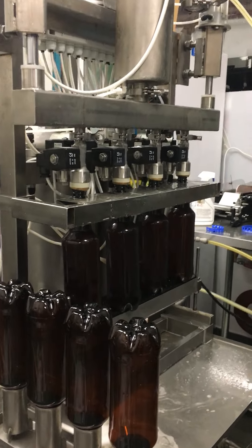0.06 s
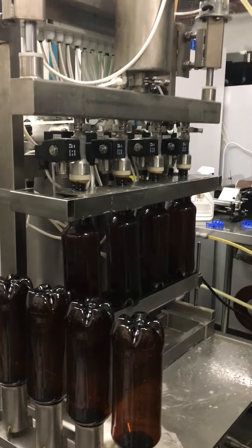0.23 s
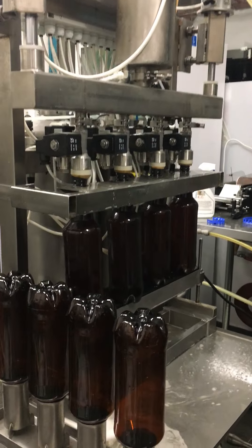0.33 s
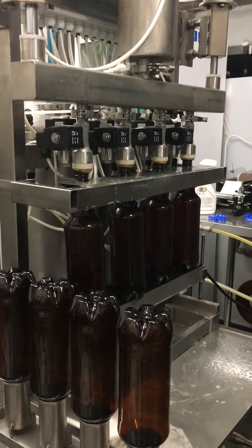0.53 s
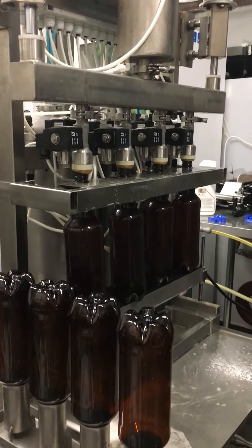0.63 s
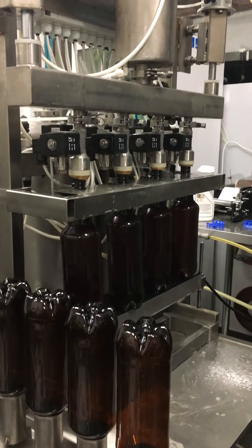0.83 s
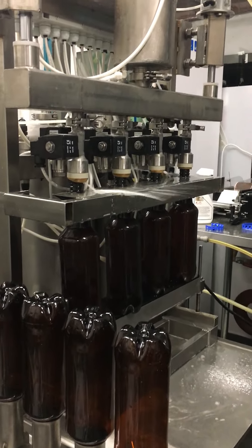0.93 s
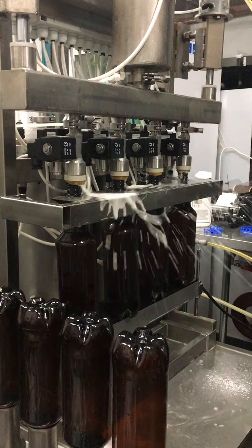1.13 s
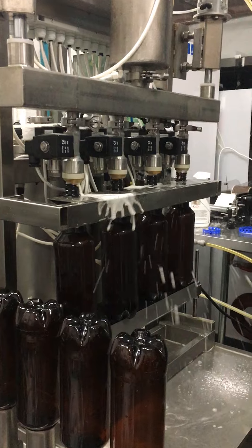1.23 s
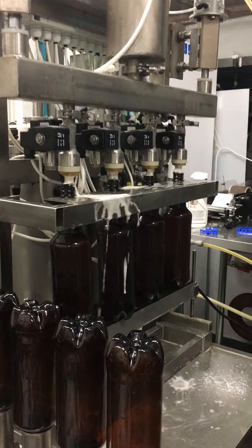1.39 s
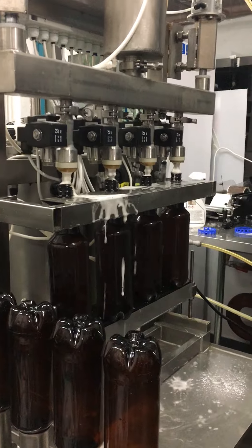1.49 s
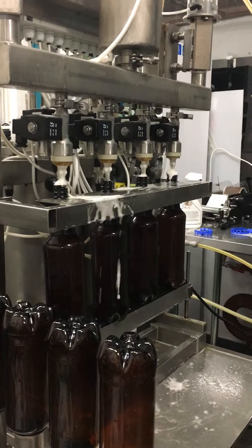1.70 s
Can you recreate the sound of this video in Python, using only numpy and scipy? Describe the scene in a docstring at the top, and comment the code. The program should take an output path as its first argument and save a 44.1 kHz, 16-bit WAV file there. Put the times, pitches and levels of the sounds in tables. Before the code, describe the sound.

A loud hiss of gas venting from a bottling machine, fading into fizzing foam.

```python
"""A humming workroom, where a bottle filler vents its pressure, heard from close by in mono.
A valve clicks, the vent pops open and a turbulent jet of gas hisses away as the pressure falls.
Foam sprays briefly past the bottle seals, then keeps fizzing and whistling in the gaps at the necks.
Steel surfaces reflect these sounds, and the room adds a short reverberant tail."""
import sys
import numpy as np
from scipy import signal
from scipy.fft import rfft, irfft
from scipy.io import wavfile

SR = 44100
rng = np.random.default_rng(int(sys.argv[2]) if len(sys.argv) > 2 else 0)


def log_audio(samples):
    """Write samples as a 16-bit WAV file to the path given in sys.argv[1]."""
    # one column per channel
    frames = np.atleast_2d(samples).T
    # limit to full scale, then quantise
    limited = np.clip(frames, -1, 1)
    pcm = np.round(limited * 32767).astype(np.int16)
    wavfile.write(sys.argv[1], SR, pcm)


N = 77175

# Spectrum of the room noise: frequency_hz, gain_db
ROOM_SPECTRUM = [(20, -34), (45, -3.5), (75, -4.5), (130, -1), (320, -1.5), (480, -10.5), (620, -7.5),
                 (760, -14.5), (1500, -18.5), (2500, -26.5), (4500, -36), (7500, -38.5), (15500, -41)]
# Peak of thin, steady hiss in the room noise: centre_hz, width_hz, lift_db
HISS_PEAK = [(9500, 330, 10)]
# Partials of the machine hum: pitch_hz, level_db
HUM_PARTIALS = [(52, -73), (104, -60.5), (210, -60.5), (268, -65), (318, -59), (635, -61.5)]
# Time for the reverberation to fall by 60 dB: frequency_hz, decay_s
REVERB_TIMES = [(150, 0.96), (1000, .45), (5000, 0.43), (15000, 0.23)]
# Spectrum of the fizzing foam: frequency_hz, gain_db
FOAM_SPECTRUM = [(100, -10.5), (500, -15.5), (1100, -6.5), (1900, -9.5), (2600, -7), (3400, -8),
                 (4600, -0.5), (6100, -6.5), (7500, -14), (9000, -2), (10300, -18), (11800, -15.5),
                 (13300, -21), (15500, -16.5)]
# Resonances of the bottle necks: centre_hz, width_hz, lift_db
NECK_RESONANCES = [(6050, 330, 3), (8950, 630, -4.5), (11260, 650, 11.5)]
# Whistles of the wet gaps: start_s, rise_s, pitch_hz, glide_hz_per_s, width_hz, level_db, fall_db_per_s
GAP_WHISTLES = [(1.001, 0.12, 4240, 751, 332, -40.5, 21), (1.25, .25, 10800, 349, 600, -52, 10.5)]
# Spectrum of the spray past the seals: frequency_hz, gain_db
SPRAY_SPECTRUM = [(200, -42), (1500, -3.5), (4500, -11), (7300, -2.5), (9000, 7), (10300, 0), (11500, 7),
                  (13200, 4.5), (15500, -0.5)]
# Spectrum of the valve click: frequency_hz, gain_db
CLICK_SPECTRUM = [(100, 0), (800, -19), (2500, -19), (3900, 13), (5200, -17), (7000, 11), (10000, 1),
                  (15500, -2)]
# Spectrum of the first leak through the valve: frequency_hz, gain_db
LEAK_SPECTRUM = [(100, -3), (1000, -7), (3900, -16), (5200, -12), (9000, -10), (15500, -11.5)]
# Spectrum of the puff from the opening vent: frequency_hz, gain_db
PUFF_SPECTRUM = [(25, -19), (55, -3), (100, 1.5), (250, 2.5), (500, 1), (1000, -9), (1800, 1), (4000, -6),
                 (15000, -29)]
# Spectrum of the jet at full pressure: frequency_hz, gain_db
FULL_JET_SPECTRUM = [(30, -49), (110, -10), (300, -5.5), (600, -8.5), (1100, -4), (2200, -3.5),
                     (3300, -2.5), (6000, 0), (7300, -2.5), (9500, 2), (10500, -6), (13000, -2),
                     (15500, -5.5)]
# Spectrum of the jet when nearly spent: frequency_hz, gain_db
SPENT_JET_SPECTRUM = [(30, -41), (110, -19), (300, -26), (600, -14.5), (1100, -7), (1700, -6.5),
                      (2200, -1.5), (3300, -1), (4600, 0), (6000, -1.5), (7300, -6.5), (9500, -1.5),
                      (10500, -8), (11800, -1.5), (15500, -5.5)]
# Resonances of the vent: centre_hz, width_hz, full_lift_db, spent_lift_db
VENT_RESONANCES = [(2036, 110, 7, 3), (2244, 62, 7, 1), (4120, 124, 6.5, 5), (4320, 100, 2.5, 5),
                   (5280, 150, 3.5, 3), (6030, 100, -3, 6), (8330, 200, 2.5, 1.5), (9200, 300, 1.5, -0.5),
                   (11500, 400, 1.5, 2)]

CLICK_S, OPEN_S = 0.2212, 0.2371


def amp(db):
    """Amplitude ratio of a level in decibels."""
    return 10 ** (np.asarray(db) / 20)


def unit(x):
    """The signal scaled to an rms of one."""
    return x / np.sqrt(np.mean(x ** 2) + 1e-20)


def curve_at(points, hz):
    """Interpolation of a table on a logarithmic frequency axis."""
    table_hz, value = np.transpose(points)
    return np.interp(np.log(hz + 1), np.log(table_hz + 1), value)


def since(start_s):
    """Seconds elapsed since an onset, zero before it."""
    return np.maximum(np.arange(N) / SR - start_s, 0)


def noise(spectrum, resonances=(), drive=None):
    """Source and filter: white noise, or a given drive, is coloured by a spectrum and its resonances."""
    if drive is None:
        drive = rng.standard_normal(N)
    hz = np.fft.rfftfreq(N, 1 / SR)
    peaks_db = sum(lift / (1 + (2 * (hz - centre) / width) ** 2) for centre, width, lift in resonances)
    return unit(irfft(rfft(drive) * amp(curve_at(spectrum, hz) + peaks_db), N))


def drift(rate_hz):
    """Low-passed noise: a random fluctuation up to about the given rate."""
    hz = np.fft.rfftfreq(N, 1 / SR)
    lowpass = np.exp(-(hz / rate_hz) ** 2) * (hz > 0)
    return unit(irfft(rfft(rng.standard_normal(N)) * lowpass, N))


def flutter_db():
    """Random amplitude modulation: a quick flicker of the level, 0.5 dB rms."""
    return 0.5 * drift(rate_hz=60)


def workroom_hum(waver=0.47, room_db=-47.5):
    """Superposition: machine partials, wavering in amplitude and phase, add to broadband room noise."""
    t = since(0)
    hum = np.zeros(N)
    for pitch_hz, level_db in HUM_PARTIALS:
        amplitude = amp(level_db) * np.sqrt(2) * (1 + waver * drift(rate_hz=18))
        phase = 2 * np.pi * (pitch_hz * t + rng.random()) + waver * drift(rate_hz=4.3)
        hum += amplitude * np.sin(phase)
    return hum + amp(room_db) * noise(ROOM_SPECTRUM, HISS_PEAK)


def reverberate(direct, steel_db=-10.5, steel_decay_s=0.036, tail_db=-12.5):
    """Reflection: early echoes off the steel frame precede a diffuse tail whose treble dies first."""
    t = np.arange(SR // 2) / SR
    echoes_per_s, steel_delay_s, tail_delay_s = 3000, 0.002, 0.012
    echoes = rng.choice([-1., 1.], len(t)) * (rng.random(len(t)) < echoes_per_s / SR)
    steel = echoes * (t > steel_delay_s) * np.exp(-t / steel_decay_s)
    diffuse = rng.standard_normal(len(t)) * (t > tail_delay_s)
    hz, frame_s, bands = signal.stft(diffuse, SR, nperseg=256)
    decay = amp(-60 * frame_s / curve_at(REVERB_TIMES, hz)[:, None])
    tail = signal.istft(bands * decay, SR, nperseg=256)[1][:len(t)]
    response = amp(steel_db) * steel / np.linalg.norm(steel) + amp(tail_db) * tail / np.linalg.norm(tail)
    return direct + signal.fftconvolve(direct, response)[:N]


def droplets(drops_per_s=2300, spread_db=2, power_share=0.24):
    """Shot noise: tiny, randomly timed bursts of uneven size mix with rushing gas."""
    size = amp(spread_db * np.minimum(rng.exponential(1, N), 4))
    bursts = size * rng.choice([-1, 1], N) * (rng.random(N) < drops_per_s / SR)
    return np.sqrt(power_share) * unit(bursts) + np.sqrt(1 - power_share) * rng.standard_normal(N)


def foam(start_s=0.87, rise_s=0.24, level_db=-33, fall_db_per_s=9):
    """Resonance: the bottle necks colour the fizz of wet gas escaping through narrow gaps."""
    t = since(start_s)
    fizz = noise(FOAM_SPECTRUM, NECK_RESONANCES, droplets())
    return fizz * np.minimum(t / rise_s, 1) * amp(level_db - fall_db_per_s * t + flutter_db())


def gap_whistle(start_s, rise_s, pitch_hz, glide_hz_per_s, width_hz, level_db, fall_db_per_s):
    """Narrowband noise has a pitch; here it creeps up as foam fills the gap."""
    t = since(start_s)
    offset_hz = np.fft.fftfreq(N, 1 / SR)
    band = np.fft.ifft(np.fft.fft(rng.standard_normal(N)) / (1 + (2 * offset_hz / width_hz) ** 2))
    carrier = np.exp(2j * np.pi * np.cumsum(pitch_hz + glide_hz_per_s * t) / SR)
    tone = unit((band * carrier).real)
    return tone * np.minimum(t / rise_s, 1) * amp(level_db - fall_db_per_s * t)


def spray(start_s=0.91, rise_s=0.17, lift_s=1.127, level_db=-28.5, fall_db_per_s=149):
    """Droplet noise: a sheet of liquid hisses brightly past the seals and dies away as they lift."""
    swell = np.minimum(since(start_s) / rise_s, 1)
    hiss = noise(SPRAY_SPECTRUM, drive=droplets())
    return hiss * swell * amp(level_db - fall_db_per_s * since(lift_s) + flutter_db())


def valve():
    """Damped transients: a metallic click and a small leak, then the pop and puff of the vent opening."""
    t, open_t = since(CLICK_S), since(OPEN_S)
    click_decay_s, ring_decay_s, pop_decay_s, puff_decay_s = 0.00075, 0.001, 0.00024, 0.0079
    ring_hz, pop_hz = 3770, 1300
    click = amp(-14.5) * noise(CLICK_SPECTRUM) * (t > 0) * np.exp(-t / click_decay_s)
    ring = amp(-15.5) * np.sin(2 * np.pi * ring_hz * t) * np.exp(-t / ring_decay_s)
    leak = amp(-27) * noise(LEAK_SPECTRUM) * (t > 0) * (open_t == 0)
    pop_envelope = open_t / pop_decay_s * np.exp(1 - open_t / pop_decay_s)
    pop = amp(-5) * np.sin(2 * np.pi * pop_hz * open_t) * pop_envelope
    puff = amp(-19) * noise(PUFF_SPECTRUM) * (open_t > 0) * np.exp(-open_t / puff_decay_s)
    return click + ring + leak + pop + puff


def gas_jet(rise_s=0.0013, surge_s=0.19, thinning_s=0.61, empty_s=1.0):
    """Turbulence excites the vent's resonances; the hiss fades and thins as the pressure drops."""
    t = since(OPEN_S)
    base_db, surge_db, fall_db_per_s, emptying_db_per_s = -18.5, 6, 11.5, 46
    fall_db = fall_db_per_s * t + emptying_db_per_s * since(empty_s)
    level_db = base_db + surge_db * np.exp(-t / surge_s) - fall_db
    full = noise(FULL_JET_SPECTRUM, [(hz, width, lift) for hz, width, lift, _ in VENT_RESONANCES])
    spent = noise(SPENT_JET_SPECTRUM, [(hz, width, lift) for hz, width, _, lift in VENT_RESONANCES])
    spent_share = np.sin(np.clip(t / thinning_s, 0, 1) * np.pi / 2)
    gas = np.sqrt(1 - spent_share) * full + np.sqrt(spent_share) * spent
    return gas * (1 - np.exp(-t / rise_s)) * amp(level_db + flutter_db())


def scene():
    """Sound pressures add: the filler, its reflections and the hum, the same in both ears."""
    filler = valve() + gas_jet() + spray() + foam() + sum(gap_whistle(*row) for row in GAP_WHISTLES)
    mono = reverberate(filler) + workroom_hum()
    return np.array([mono, mono])


def record(dry, cutoff_hz=15780):
    """Band limiting: a steep low-pass filter removes the highest treble."""
    lowpass = signal.firwin(711, cutoff_hz, window=("kaiser", 9), fs=SR)
    return signal.oaconvolve(dry, lowpass[None], "same")


dry = scene()
out = record(dry)
log_audio(out)
```